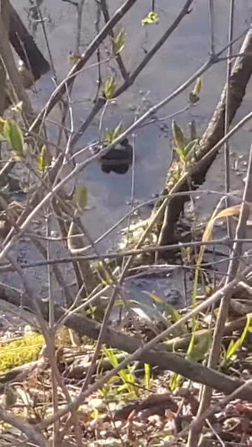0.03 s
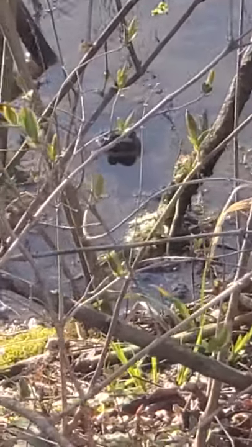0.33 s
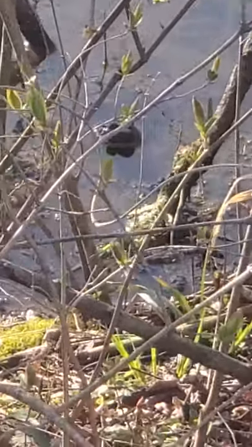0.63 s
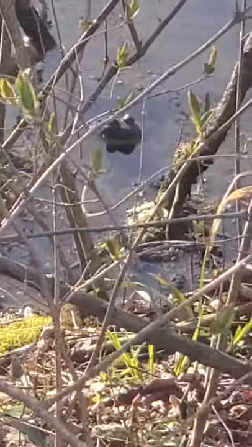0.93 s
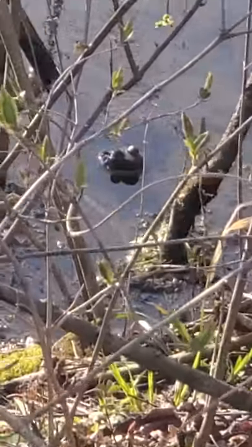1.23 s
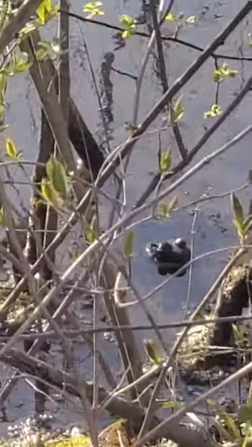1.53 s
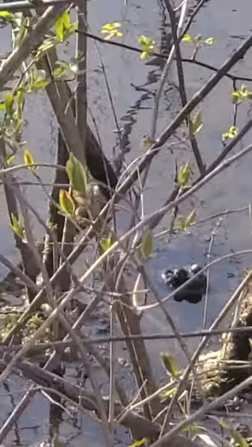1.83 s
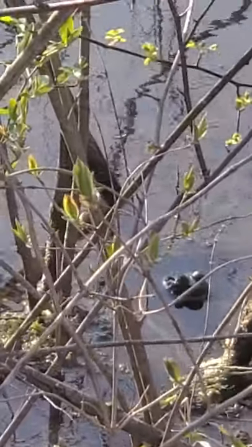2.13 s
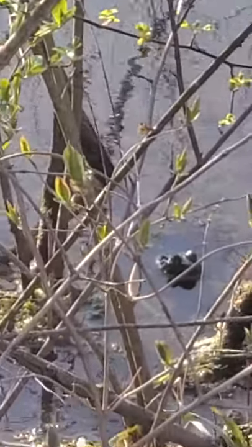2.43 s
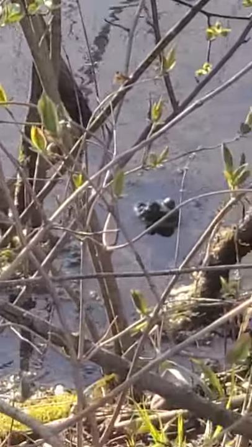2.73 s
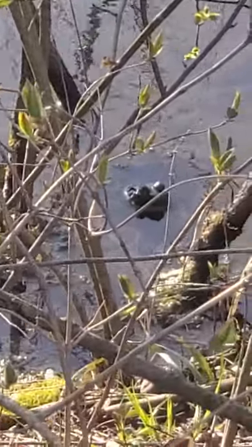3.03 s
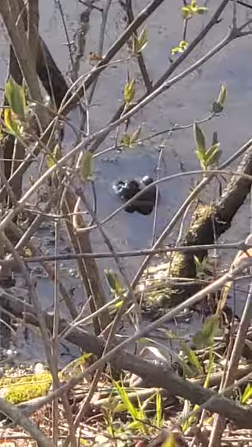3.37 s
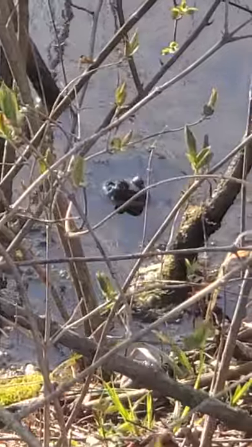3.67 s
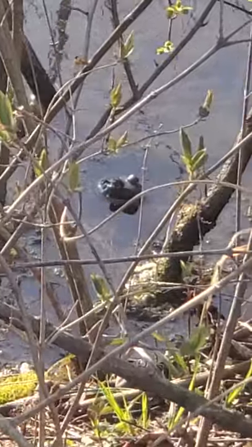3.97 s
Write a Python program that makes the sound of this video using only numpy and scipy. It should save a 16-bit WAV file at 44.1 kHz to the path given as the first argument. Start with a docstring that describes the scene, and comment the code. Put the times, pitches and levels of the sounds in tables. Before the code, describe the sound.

A low, steady rumble of far traffic and engines under faint woodland birdsong.

```python
"""The bank of a woodland pond in spring. Far traffic rumbles as broadband noise, and two distant engines drone,
the louder one sinking in pitch. Small birds sing in near-pure gliding tones (a two-note song, a row of chips,
loose whistles) and give two harsh calls rich in harmonics; trunks scatter these into a short reverberation,
with a blurred chorus beyond. Close to the right microphone a soft, high hiss of friction comes and goes, and a
twig ticks once."""
import sys
import numpy as np
from scipy import signal
from scipy.fft import rfft, irfft
from scipy.io import wavfile

SR = 44100
rng = np.random.default_rng(int(sys.argv[2]) if len(sys.argv) > 2 else 0)


def int16_out(signal):
    """Quantize to a 16-bit WAV file."""
    q = np.round(np.clip(np.atleast_2d(signal).T, -1, 1) * 32767)
    wavfile.write(sys.argv[1], SR, q.astype(np.int16))


N = 176400
T = np.arange(N) / SR
FREQS = np.maximum(np.arange(N // 2 + 1) * SR / N, 1)
TRAFFIC_LAG_S, BIRD_LAG_S = .00022, .0002  # delay at the right microphone


def traffic(rumble_gain_db=1, rush_gain_db=2):
    """Incoherent sources sum to noise: a deep rumble under the rush of far tyres and air."""
    # spectra (frequency [Hz], relative density [dB])
    rumble_spectrum = [(20, -23.5), (32, -3), (48, 3.5), (62, 9), (85, 9.5), (110, 3.5), (150, -1),
                       (200, -6), (280, -17.5), (420, -60)]
    rush_spectrum = [(150, -6), (300, 0), (450, -2.5), (730, -0.5), (1000, -4), (1350, -10), (1800, -24),
                     (2600, -38.5), (3600, -39), (5000, -42.5), (7000, -49.5), (11000, -41.5), (15500, -44)]
    # envelopes (time [s], level before gain [dB])
    rumble_envelope = [(0, -44), (.13, -40), (.3, -42.5), (1.1, -44), (1.4, -39), (1.8, -45), (2.73, -41),
                       (2.9, -45.5), (3.42, -47), (3.6, -40.5), (3.85, -39.5), (4, -42)]
    rush_envelope = [(0.0, -56), (0.12, -56), (1.07, -58.5), (3.93, -56.5), (4.0, -54)]
    rumble = from_db(rumble_gain_db + in_time(rumble_envelope)[0]) * noise(rumble_spectrum, TRAFFIC_LAG_S)
    rush = from_db(rush_gain_db + in_time(rush_envelope)[0]) * noise(rush_spectrum, TRAFFIC_LAG_S / 2)
    return rumble + rush


def engine(wander_hz=.7, flutter_db=3.04):
    """A periodic source radiates harmonics; each fades independently on its way through the air."""
    # course of the drone (time [s], frequency of the strongest partial [Hz], base level [dB])
    course = [(0.0, 115.6, -47), (0.1, 114.2, -41.5), (0.66, 113.2, -47.5), (0.68, 113, -46),
              (1.25, 112.9, -41), (1.99, 104.2, -39.5), (2.07, 104.3, -49), (2.19, 103.1, -41.5),
              (2.6, 103.3, -35.5), (2.8, 103.0, -42), (3.84, 102.6, -36.5), (4.0, 105.8, -39.5)]
    # harmonic series (multiple of that frequency [ratio], relative level [dB])
    partials = [(.5, -13), (1, -0.5), (1.5, -15), (2, -24.5)]
    hz, db = in_time(course)
    phase = phase_of(hz + wander_hz * drift(5))
    drone = np.zeros(N)
    for multiple, partial_db in partials:
        amplitude = np.sqrt(2) * from_db(db + partial_db + flutter_db * drift(8.6))
        drone += amplitude * np.sin(multiple * phase + rng.uniform(0, 2 * np.pi))
    return panned(drone, pan_db=-1.2)


def lower_engine(hz=86.8, db=-46, wander_hz=2.22, flutter_db=3):
    """A less steady engine note: one sinusoid, randomly modulated in amplitude and frequency."""
    amplitude = from_db(db + flutter_db * drift(1.9))
    return amplitude * np.sin(phase_of(hz + wander_hz * drift(8)))


def bird_note(length, start_hz, end_hz, db, pan_db, bend=.5, warble_hz=39.8, flutter_db=2.5):
    """A whistle is a frequency-modulated tone; its glide starts fast and then slows."""
    t = np.arange(int(length * SR)) / SR
    progress = t / length
    glide = progress + bend * progress * (1 - progress)
    hz = start_hz + (end_hz - start_hz) * glide + warble_hz * waver(t, rate_hz=180)
    amplitude = from_db(db + flutter_db * waver(t, rate_hz=130))
    return panned(amplitude * swell(progress) * np.sin(phase_of(hz)), pan_db)


def birdsong():
    """Tonal notes superpose: a two-note song ending on its low note, falling chips, loose whistles."""
    # phrases of the song (time [s], base level [dB])
    phrases = [(.235, -77), (.54, -74), (.85, -66.5), (1.16, -68), (1.47, -75)]
    # its notes (delay [s], length [s], start [Hz], end [Hz], relative level [dB], pan [dB])
    low_note = (0, 0.12, 2178, 2026, 2, 3.5)
    high_note = (.135, .06, 2650, 2510, 5.4, 12)
    # row of chips (time [s], level [dB])
    chips = [(1.937, -81), (2.235, -78.5), (2.53, -73.5), (2.829, -81.5), (3.121, -82), (3.418, -75)]
    # loose whistles (time [s], length [s], start [Hz], end [Hz], level [dB], pan [dB])
    whistles = [(0.221, 0.055, 3000, 2920, -75.5, 9), (.425, .06, 2700, 2850, -80, 8),
                (.74, .06, 2720, 2760, -79, 7), (0.823, 0.033, 3300, 3460, -72, 14),
                (1.054, 0.037, 2780, 2760, -70, -3), (1.137, 0.08, 3380, 3440, -75.5, 8),
                (1.364, 0.026, 2790, 2670, -76.5, 5), (1.414, 0.034, 4150, 4320, -81.5, 4),
                (1.61, .03, 3120, 2900, -78, 1), (1.765, 0.074, 2260, 2301, -70, -5),
                (1.977, 0.048, 2680, 2760, -80, 11), (2.14, 0.068, 2450, 2540, -72, 5),
                (2.259, 0.046, 2580, 2810, -70, 24), (2.315, 0.073, 3030, 3067, -62, 13),
                (2.44, 0.059, 2520, 2428, -67, 10), (2.565, 0.064, 2620, 2730, -66, 8.5),
                (2.732, 0.057, 3330, 2970, -66, 23.5), (2.86, 0.058, 2620, 2730, -66.5, 16),
                (3.026, .075, 2380, 2270, -69, 9), (3.167, 0.053, 2700, 2675, -67.5, 10),
                (3.325, .035, 2420, 2440, -76, 6.5), (3.388, 0.072, 3270, 2920, -67, 28),
                (3.489, 0.029, 3080, 3030, -63, 11), (3.568, 0.16, 2420, 1670, -57, -8),
                (3.594, 0.031, 3050, 2850, -62, 17), (3.9, .045, 4850, 4470, -70.5, 16),
                (3.97, .05, 3230, 3001, -62, 16)]
    out = np.zeros((2, N))
    for sung_in, note in ((phrases, low_note), (phrases[:-1], high_note)):
        delay, length, start_hz, end_hz, note_db, pan_db = note
        for onset, db in sung_in:
            add(out, onset + delay, bird_note(length, start_hz, end_hz, db + note_db, pan_db))
    for onset, db in chips:
        add(out, onset, bird_note(length=.026, start_hz=4130, end_hz=3220, db=db, pan_db=11.5))
    for onset, *note in whistles:
        add(out, onset, bird_note(*note))
    return out


def harsh_calls(length=.033, pitch_hz=340, jitter=.049, formant_hz=4070, width_hz=700):
    """Source and filter: a jittery harmonic series is weighted by one throat resonance."""
    # calls (time [s], level [dB])
    calls = [(1.059, -69), (2.907, -74)]
    out = np.zeros((2, N))
    t = np.arange(int(length * SR)) / SR
    orders = np.arange(8, 18)[:, None]
    throat = np.exp(-.5 * ((orders * pitch_hz - formant_hz) / width_hz) ** 2)
    for onset, db in calls:
        phase = phase_of(pitch_hz * (1 + jitter * waver(t, rate_hz=320)))
        harmonics = np.sin(orders * phase + rng.uniform(0, 2 * np.pi, orders.shape))
        voice = unit_rms((throat * harmonics).sum(0))
        add(out, onset, panned(from_db(db) * voice * swell(t / length), pan_db=22))
    return out


def twig(onset=1.871, db=-42.5, rise_s=.00046, decay_s=.0017):
    """A heavily damped transient: one dry tick of noise with an exponential decay."""
    # spectrum of the tick (frequency [Hz], relative density [dB])
    spectrum = [(250, -10), (600, 0), (1200, -1), (2300, -12), (4000, -22), (7000, -45), (14000, -70)]
    age = T - onset
    envelope = np.clip(age / rise_s, 0, 1) * np.exp(-np.abs(age) / decay_s)
    return panned(from_db(db) * envelope * noise(spectrum), pan_db=2)


def brushing(grain_db=.8, left_db=-14):
    """Friction makes a soft, high hiss, so near the right microphone that the left gets little."""
    # spectrum of the friction (frequency [Hz], relative density [dB])
    spectrum = [(2000, -14), (4500, -15), (7800, -26), (8750, -20), (9150, -3), (9900, 1), (11000, -3),
                (13000, -7), (13700, -12), (15500, -15)]
    # envelope on the right (time [s], level [dB])
    envelope = [(0, -83), (.2, -78.5), (.5, -73.5), (.66, -66), (.78, -68), (.9, -66), (1.02, -67),
                (1.12, -72), (1.42, -68.5), (1.65, -72.5), (1.82, -74), (1.93, -100), (4, -110)]
    hiss = from_db(in_time(envelope)[0] + grain_db * drift(60)) * noise(spectrum)
    return hiss * from_db([[left_db], [0]])


def far_chorus(patchy_db=4, relative_width=.027):
    """Birds too far to tell apart merge into narrow noise bands that come and go independently."""
    # spectrum of the blurred song (frequency [Hz], relative density [dB])
    spectrum = [(1500, -30.5), (2000, -6.5), (2400, 1.5), (3000, -5.5), (3600, -13), (5000, -37.5)]
    # its envelope (time [s], level [dB])
    envelope = [(0, -83), (.7, -74.5), (1.4, -75.5), (2, -78.5), (2.5, -74), (3.2, -74), (3.6, -72),
                (3.8, -87.5), (4, -85.5)]
    blur = rfft(noise(spectrum))
    bands = np.zeros((2, N))
    for centre_hz in np.geomspace(1900, 3800, num=12):
        passband = np.exp(-(np.log(FREQS / centre_hz) / relative_width) ** 2)
        bands += irfft(blur * passband, N) * from_db(patchy_db * drift(7.3))
    return panned(from_db(in_time(envelope)[0]) * unit_rms(bands), pan_db=3)


def woods(x, t60_s=.4, delay_s=.012, echo_db=-7):
    """Reverberation: trunks scatter sound into a diffuse, exponentially dying tail."""
    t = T[:SR]
    tail = rng.standard_normal((2, SR)) * from_db(-60 * t / t60_s) * (t > delay_s)
    tail /= np.sqrt(np.sum(tail ** 2, axis=1, keepdims=True))
    return x + from_db(echo_db) * signal.fftconvolve(x, tail, axes=1)[:, :N]


def noise(spectrum, lag_s=0):
    """Partly coherent stereo noise: alike in the bass, unrelated in the treble."""
    # likeness of left and right (frequency [Hz], correlation [ratio])
    likeness = [(25, .45), (60, .6), (130, .87), (290, .7), (640, .68), (1400, .35), (3000, .05),
                (15000, 0)]
    correlation = at_freqs(likeness)
    mid, side = rfft(rng.standard_normal((2, N)))
    mid *= np.sqrt(1 + correlation)
    side *= np.sqrt(1 - correlation)
    delay = np.exp(-2j * np.pi * FREQS * lag_s)
    pair = np.array([mid + side, (mid - side) * delay])
    return unit_rms(irfft(pair * from_db(at_freqs(spectrum)), N))


def lagged(x, lag_s):
    """Path difference: sound from the left reaches the right microphone later."""
    return np.array([x[0], np.interp(T - lag_s, T, x[1])])


def panned(x, pan_db):
    """Level difference, left minus right, at constant power."""
    return unit_rms(from_db([[pan_db / 2], [-pan_db / 2]])) * x


def drift(rate_hz):
    """Slow random modulation: low-passed noise of unit rms."""
    size = N // 40
    rolloff = 1 + (FREQS[:size // 2 + 1] / rate_hz) ** 2
    slow = irfft(rfft(rng.standard_normal(size)) / rolloff, size)
    return np.interp(T, np.linspace(0, T[-1], size), unit_rms(slow))


def waver(t, rate_hz):
    """Random modulation within one note."""
    return np.interp(t * rate_hz, np.arange(256), rng.standard_normal(256))


def swell(progress, edge=.16):
    """Quarter-sine rise and fall as progress runs from 0 to 1."""
    return np.sin(np.pi / 2 * np.clip(np.minimum(progress, 1 - progress) / edge, 0, 1))


def phase_of(hz):
    """Phase is the time integral of frequency."""
    return 2 * np.pi * np.cumsum(hz) / SR


def from_db(db):
    """Decibels to amplitude ratio."""
    return 10 ** (np.asarray(db) / 20)


def unit_rms(x):
    """Normalise to unit mean power."""
    return x / np.sqrt(np.mean(x ** 2) + 1e-20)


def in_time(rows):
    """Interpolate a curve's columns at every sample."""
    times, *columns = np.transpose(rows)
    return [np.interp(T, times, column) for column in columns]


def at_freqs(rows):
    """Interpolate a spectrum on a log-frequency axis."""
    hz, values = np.transpose(rows)
    return np.interp(np.log(FREQS), np.log(hz), values)


def add(out, onset, sound):
    """Superpose a stereo sound at an onset in seconds."""
    i = int(np.clip(onset * SR, 0, N - 1))
    out[:, i:i + sound.shape[1]] += sound[:, :N - i]


def scene():
    """Pressures add: traffic behind, birds in the trees, small noises close by."""
    birds = woods(lagged(birdsong() + harsh_calls(), BIRD_LAG_S))
    road = traffic() + lagged(engine() + lower_engine(), TRAFFIC_LAG_S)
    return road + far_chorus() + birds + twig() + brushing()


def record(dry, cutoff_hz=15700):
    """Band limiting: an elliptic low-pass cuts the top steeply."""
    return signal.sosfilt(signal.ellip(10, .1, 80, cutoff_hz, fs=SR, output="sos"), dry)


dry = scene()
out = record(dry)
int16_out(out)
```